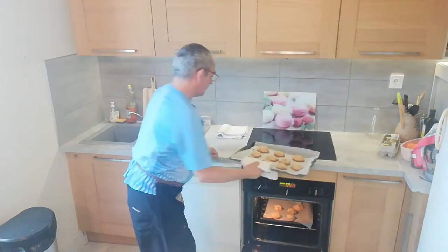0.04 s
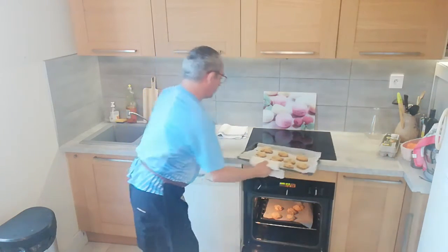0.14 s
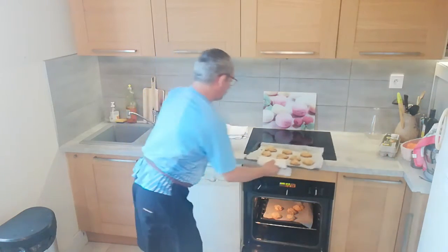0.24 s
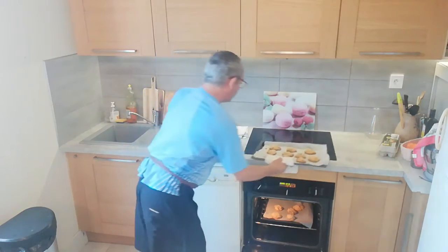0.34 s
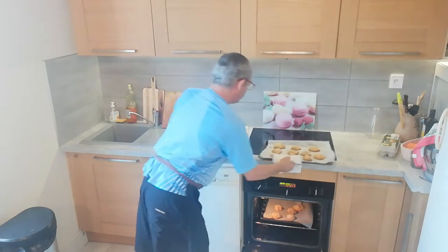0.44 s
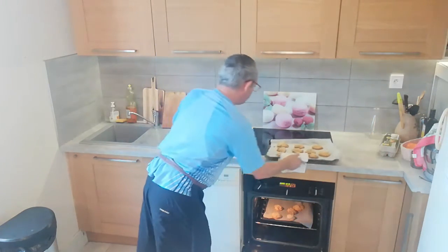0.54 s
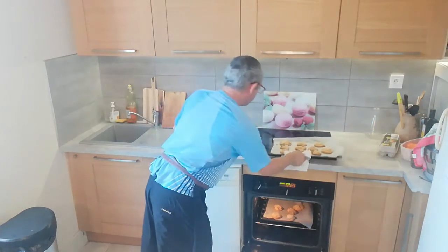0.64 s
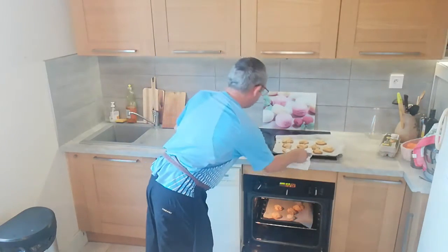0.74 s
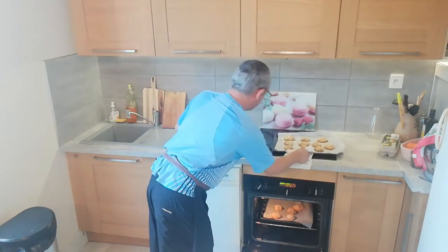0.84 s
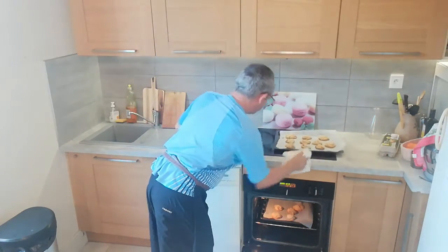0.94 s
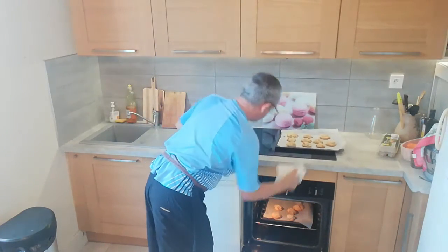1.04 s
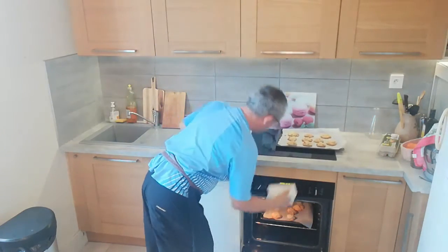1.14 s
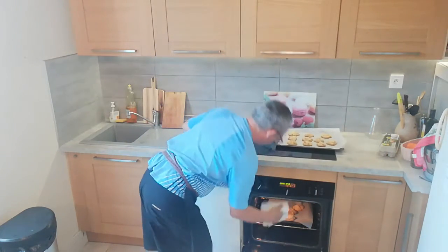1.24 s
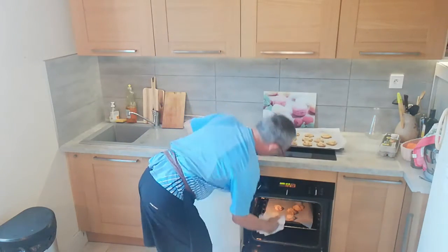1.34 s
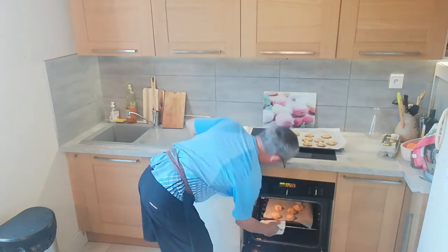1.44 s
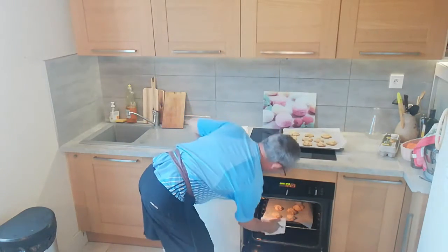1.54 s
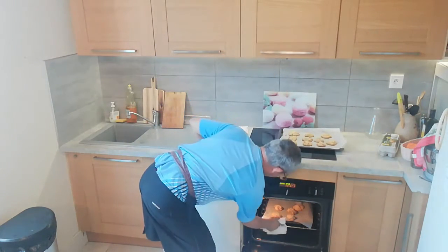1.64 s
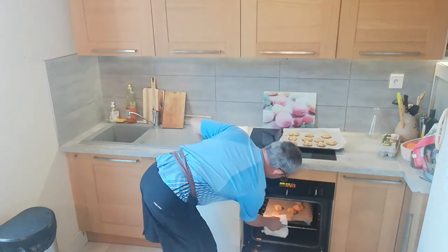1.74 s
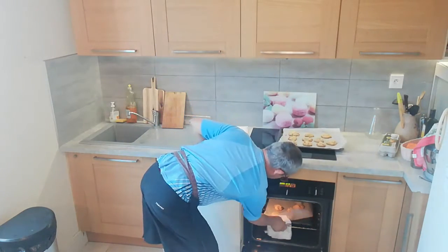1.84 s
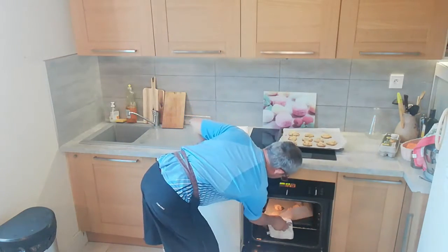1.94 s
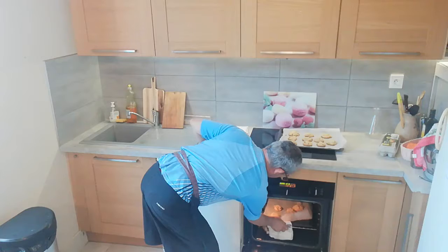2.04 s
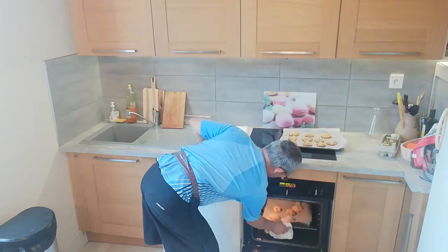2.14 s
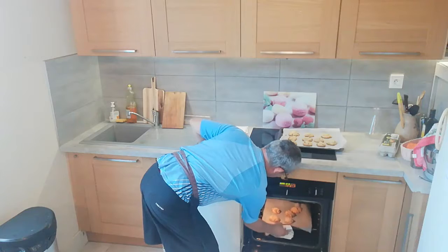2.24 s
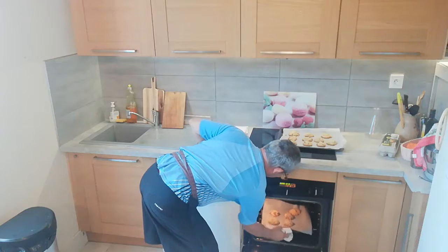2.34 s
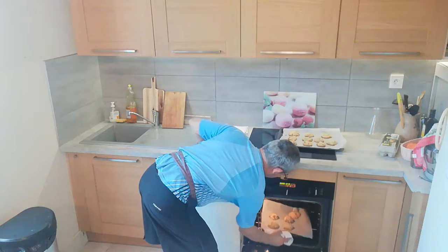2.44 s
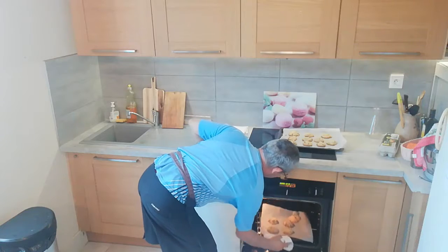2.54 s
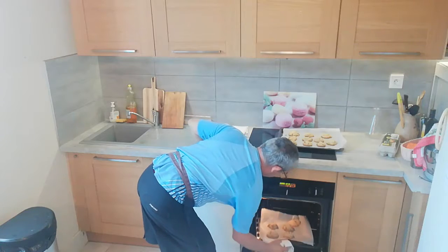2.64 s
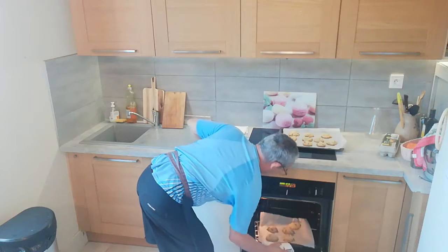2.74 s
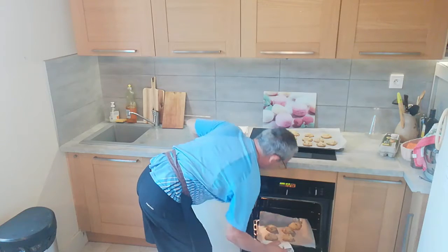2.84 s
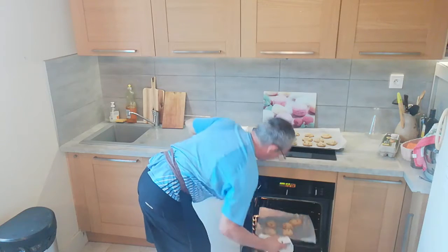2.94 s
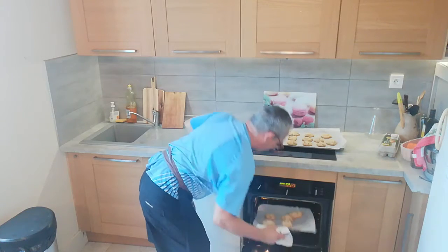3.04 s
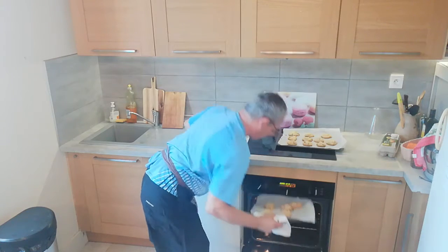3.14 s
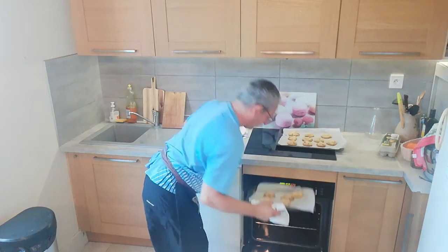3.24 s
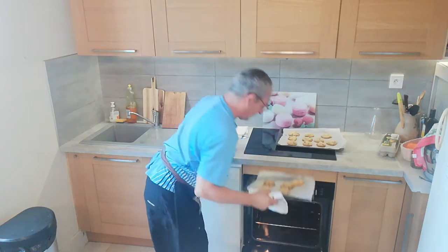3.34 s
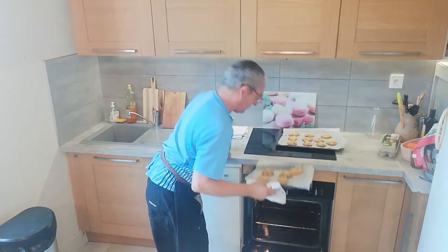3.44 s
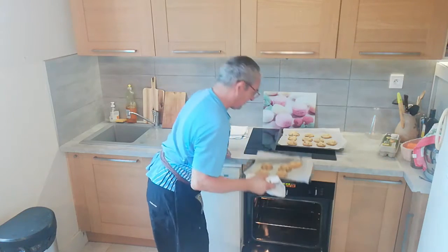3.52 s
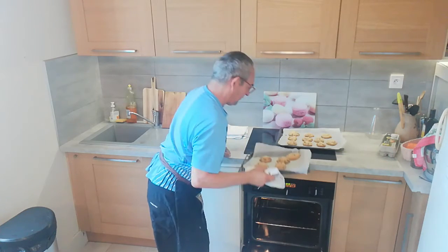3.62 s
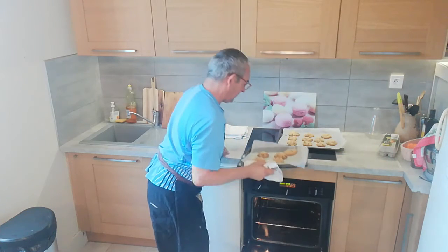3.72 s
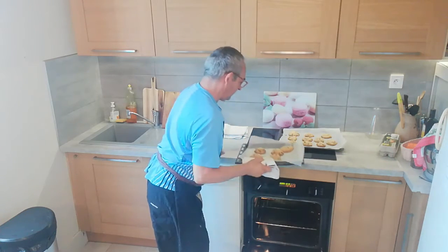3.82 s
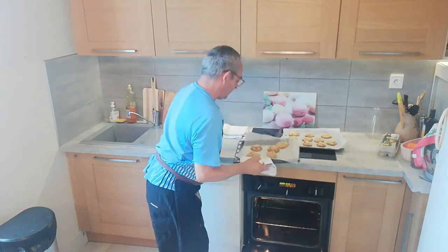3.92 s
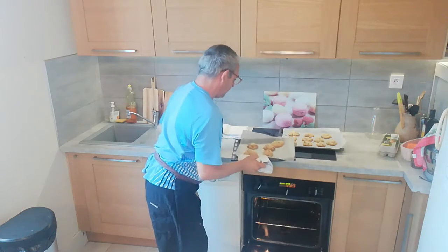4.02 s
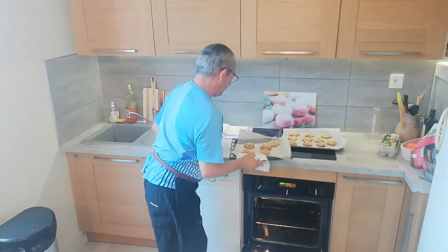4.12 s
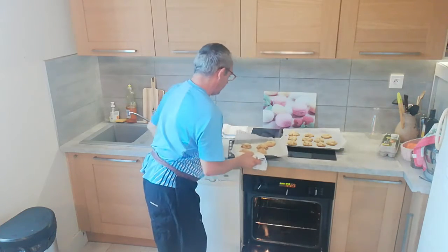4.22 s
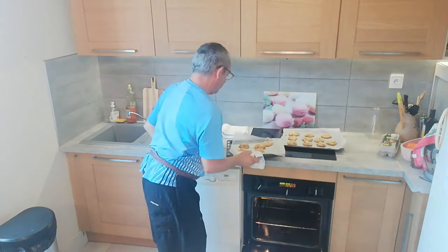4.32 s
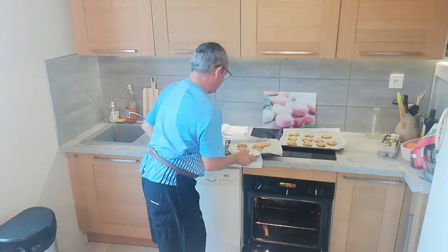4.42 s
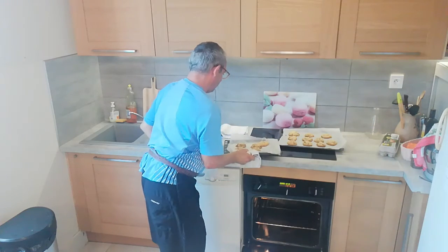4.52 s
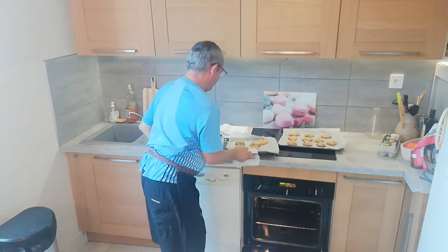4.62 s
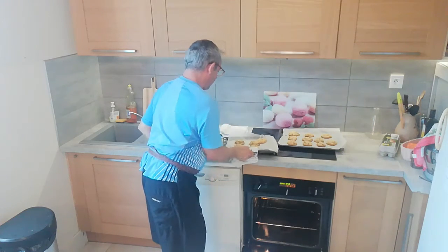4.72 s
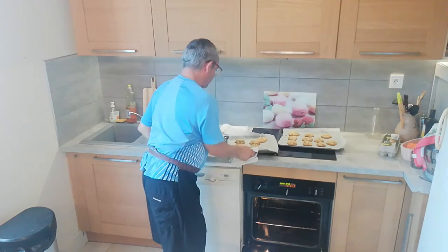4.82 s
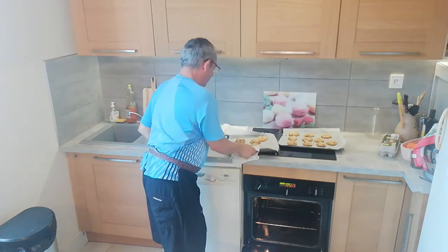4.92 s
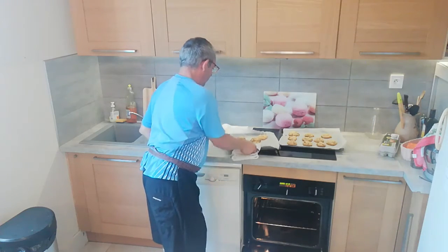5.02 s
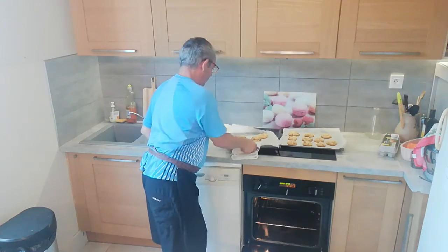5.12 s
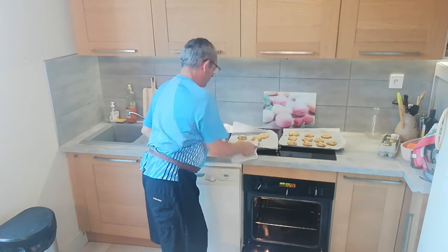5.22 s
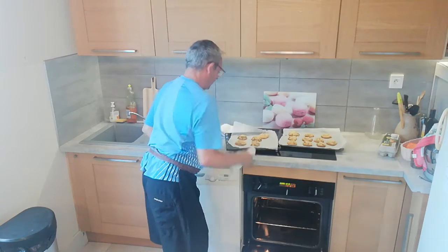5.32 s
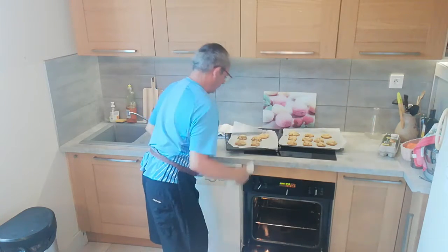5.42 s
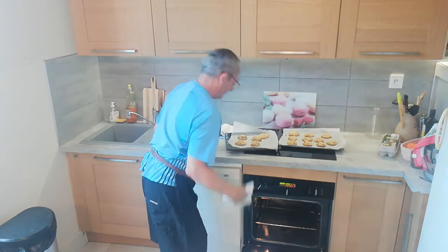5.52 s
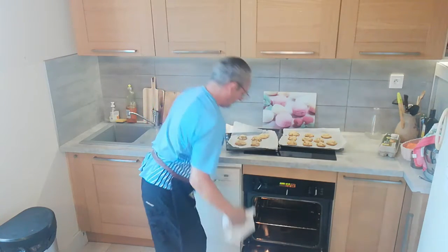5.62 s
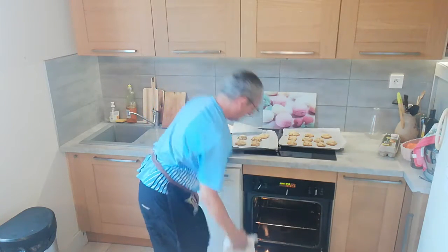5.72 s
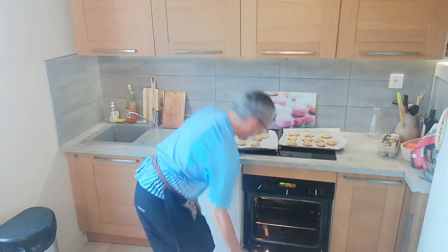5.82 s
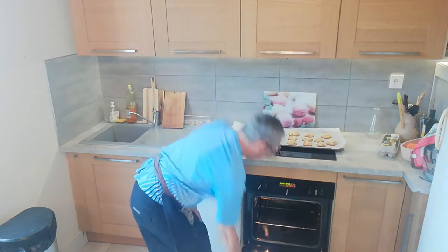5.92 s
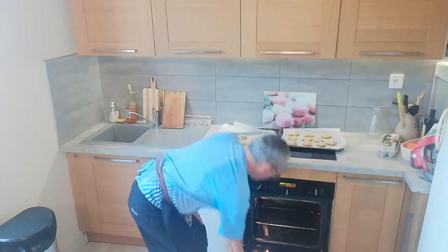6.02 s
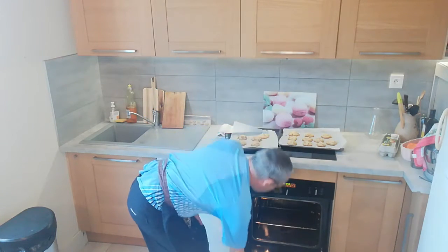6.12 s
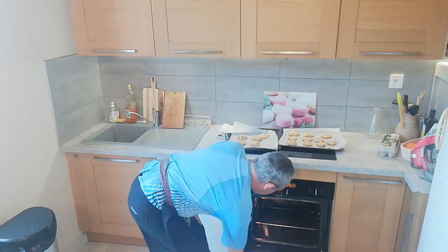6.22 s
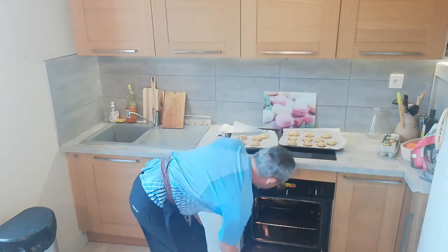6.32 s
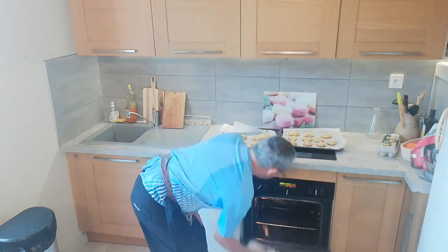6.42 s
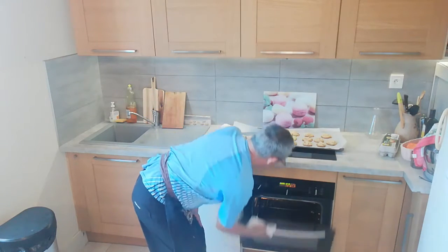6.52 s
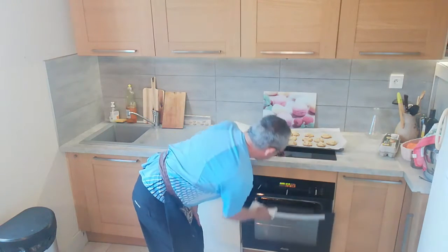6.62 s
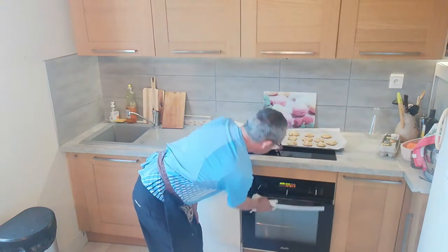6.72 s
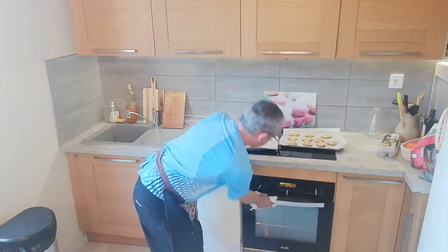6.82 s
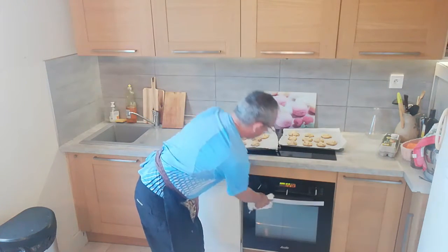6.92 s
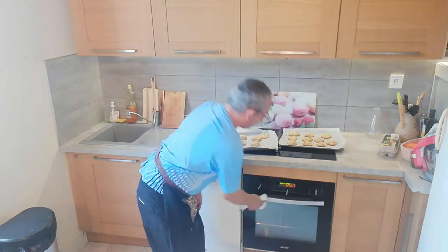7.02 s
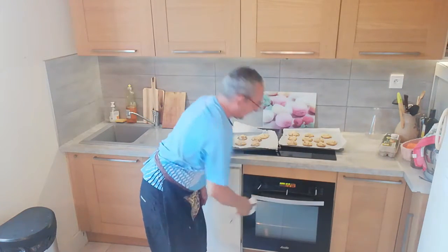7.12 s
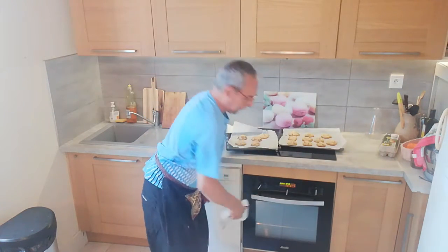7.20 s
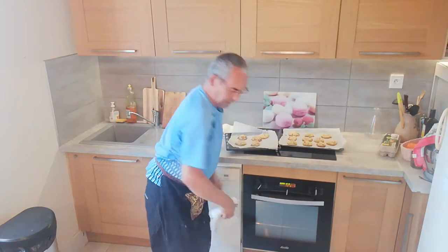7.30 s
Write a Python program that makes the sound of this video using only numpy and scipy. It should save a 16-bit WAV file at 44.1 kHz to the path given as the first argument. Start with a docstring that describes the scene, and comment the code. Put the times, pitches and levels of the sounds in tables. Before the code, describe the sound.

In a small hard-walled kitchen with a low fan hum, a metal tray bangs down and rattles on the worktop. Another is scraped from the oven with rack knocks, lifted almost quietly, then shuffled and clacked down. The oven door squeaks on its hinge and shuts with a soft double thump. Stereo microphones a short way off, right side brighter.

```python
"""Baking trays and an oven door

Baking trays are slid out of an oven and knocked down on a worktop in a hard-walled kitchen: bursts of contacts
strike dense steel modes or brighten the peaks of slides, pushes ring heavier bodies, knocks ring the rack, and
strokes of grainy noise hiss between. The oven door squeaks and whines on its hinge (fluttering tones); it bumps
and thumps shut. Coloured noise makes the fan and its hum. Of two spaced microphones, the right one is nearer
and brighter."""
import sys
import numpy as np
from scipy import signal
from scipy.fft import rfft, irfft, next_fast_len
from scipy.io import wavfile
from scipy.ndimage import uniform_filter1d

SR = 44100
rng = np.random.default_rng(int(sys.argv[2]) if len(sys.argv) > 2 else 0)


def store_pcm(level_fs):
    """Save levels as 16-bit WAV."""
    pcm = np.round(np.clip(level_fs, -1, 1) * 32767).astype(np.int16)
    wavfile.write(sys.argv[1], SR, np.atleast_2d(pcm).T)


N = 324576
SIZE = next_fast_len(N + SR)   # transform length, with room for filter tails
HZ = np.maximum(np.arange(SIZE // 2 + 1) * SR / SIZE, 1)


def amp(db):
    """Decibel law: level in dB to amplitude ratio."""
    return 10 ** (np.asarray(db) / 20)


def rms_one(x):
    """Normalisation to unit root mean square."""
    return x / np.sqrt(np.mean(x ** 2) + 1e-20)


def at_hz(points, hz):
    """Interpolation along a logarithmic frequency axis, as hearing spaces pitch."""
    points = np.array(points)
    return np.interp(np.log(hz), np.log(points[:, 0]), points[:, 1])


def band(x, low_hz, high_hz, spectrum):
    """Linear filtering: one coloured band of x; white input of rms 1 leaves with rms 1."""
    edges = 1 / np.sqrt((1 + (low_hz / HZ) ** 6) * (1 + (HZ / high_hz) ** 6))
    response = rms_one(edges * amp(at_hz(spectrum, HZ)))
    return irfft(rfft(x, SIZE) * response, SIZE)[:N]


def ring(x, modes):
    """Modal superposition: a unit click sets every damped resonator ringing at its own height."""
    out = 0
    for hz, level_db, t60 in modes:
        radius = amp(-60 / (t60 * SR))
        turn = 2 * np.pi * hz / SR
        feed = [0, amp(level_db) * np.sin(turn)]
        poles = [1, -2 * radius * np.cos(turn), radius * radius]
        out = out + signal.lfilter(feed, poles, x + 1e-18)
    return out


def stroke(start, swell, hold, fade):
    """Exponential envelope: the gain of one gesture swells evenly in dB, holds, then fades evenly in dB."""
    swell_db = 23.5   # climbed during the swell, and lost again in each fade time
    t = np.arange(N) / SR - start
    below = np.minimum(t / max(swell, 1e-3) - 1, (swell + hold - t) / fade)
    return amp(swell_db * np.minimum(below, 0)) * (t > 0)


# Coherence of the microphones above the bass. Each row: frequency in Hz, share of sound common to both (0-1).
COHERENCE = [(250, 0.73), (640, 0.37), (1400, 0.18), (3000, 0.27), (12000, 0.19)]
# Phase that the housing adds to the left lag above the bass. Each row: frequency in Hz, phase in radians.
HOUSING_PHASE = [(340, -0.9), (640, 0.76), (1030, 0.82), (1300, 1), (3000, 0.45), (6000, 0.8)]


def microphones(common, own, lean):
    """Spatial coherence: two spaced capsules share part of each spectrum, later at the left; bass reaches both alike."""
    left_lag_s = 0.00059
    apart = 1 / (1 + (200 / HZ) ** 3)   # near 0 for long bass waves, near 1 well above 200 Hz
    alike = 1 - apart * (1 - np.clip(at_hz(COHERENCE, HZ), 0, 1))
    phase = apart * (2 * np.pi * HZ * left_lag_s + at_hz(HOUSING_PHASE, HZ))
    late = np.exp(-1j * phase)
    tilt = amp(apart * at_hz(lean, HZ) / 2)
    left = np.sqrt(alike) * common * late + np.sqrt(1 - alike) * own[0]
    right = np.sqrt(alike) * common + np.sqrt(1 - alike) * own[1]
    return irfft(np.array([left * tilt, right / tilt]), SIZE)[:, :N]


# Colour of fan and room air. Each row: frequency in Hz, relative spectral density in dB per Hz.
AIR_COLOUR = [(12, -45.5), (20, -8), (53, -4), (70, -11.5), (101, -7), (163, -12), (198, -5), (228, -10.5),
              (434, -18.5), (499, -17), (873, -11), (1000, -12.5), (1220, -13), (2530, -18.5),
              (16000, -35.5)]
# Narrow bands of fan hum. Each row: centre in Hz, width in Hz, level in dB before the final mix.
FAN_HUM = [(43.4, 12, -77.5), (96.3, 8, -80), (195, 12, -84), (891.3, 9, -78)]
# Balance of the air above the bass. Each row: frequency in Hz, left minus right in dB.
AIR_BALANCE = [(60, -1), (240, 0), (950, -2), (3770, -3), (15000, 0)]


def air():
    """Stationary random noise: steady fan noise with a few wavering narrow-band hums, filling the room."""
    colour = amp(-68.5) * rms_one(amp(at_hz(AIR_COLOUR, HZ)))
    for hz, width, level_db in FAN_HUM:
        resonance = rms_one(1 / (1 + (2 * (HZ - hz) / width) ** 2))
        colour = np.hypot(colour, amp(level_db) * resonance)   # unrelated noises add in power
    noise = rfft(rng.standard_normal((3, SIZE))) * colour
    return microphones(noise[0], noise[1:], AIR_BALANCE)


# Slides and shuffles. Each row: start in seconds, swell in seconds, hold in seconds, hiss in dB before the mix,
# body in dB relative to the hiss, sheen in dB relative to the hiss.
SLIDE_STROKES = [(-0.03, .03, 0.1, -53.5, -4.5, -13.5), (0.681, 0.16, .01, -48.5, 8.5, -14),
                 (0.883, 0.015, 0.18, -48.5, -12, -11), (1.746, .03, .08, -52, -6, -10.5),
                 (1.83, 0.038, 0.081, -46.5, -1, -16), (1.893, 0.16, 0.018, -41.5, -6, -6.5),
                 (2.075, .02, 0.14, -56.5, 1, -20.5), (2.214, 0.05, 0.064, -47.5, -9, -31),
                 (2.422, .03, 0.126, -52, -10, -20), (2.554, 0.026, 0.078, -60.5, 1.5, -14.5),
                 (2.896, 0.017, 0.00995, -66.5, 3, -7), (3.028, .02, 0.047, -53.5, 1, -34),
                 (3.037, 0.079, 0.039, -44.5, -6, -7.5), (3.57, 0.043, .05, -54.5, -9.5, -15.5),
                 (4.53, .03, .12, -45, 6, -30.5), (4.674, 0.024, 0.19, -56, 7.5, -13.5),
                 (4.855, 0.024, .14, -55.5, 0, -24), (4.994, 0.079, 0.076, -44.5, -6, -10.5),
                 (5.161, 0.047, .03, -49, 3.5, -13), (5.284, 0.019, 0.023, -48.5, -2, -34),
                 (5.775, 0.11, .02, -42, -11, -17.5), (6.435, 0.077, 0.022, -49.5, -12, -16),
                 (6.564, .02, .07, -61.5, 3, -22), (7.138, 0.12, 0.087, -58.5, -1.5, -16)]
# Colour of sliding contact. Each row: frequency in Hz, relative spectral density in dB per Hz.
SLIDE_COLOUR = [(150, -37.5), (250, 0.5), (330, -17), (421, -3), (586, -19), (651, -10.5), (1530, -3),
                (4190, -5), (4820, -7), (7980, -7.5), (16000, -35.5)]


def slides(grit_db):
    """Friction noise: dense grains of uneven size sound in three bands under each stroke."""
    levels = 0
    for start, swell, hold, hiss_db, body_db, sheen_db in SLIDE_STROKES:
        gains = amp([hiss_db, hiss_db + body_db, hiss_db + sheen_db])
        levels = levels + np.outer(gains, stroke(start, swell, hold, fade=0.054))
    grain_db = grit_db * np.minimum(rng.exponential(1, N), 5)
    grains = rms_one(rng.standard_normal(N) * amp(grain_db))
    hiss = band(grains, 3600, 5500, SLIDE_COLOUR)
    body = band(grains, 200, 2100, SLIDE_COLOUR)
    sheen = band(grains, 8000, 15000, SLIDE_COLOUR)
    return levels[0] * hiss + levels[1] * body + levels[2] * sheen


# Blows on trays, rack and door, and short bright bursts at the peaks of slides. Each row: time in seconds,
# clang in dB before the mix, then in dB relative to the clang: weight (low ring), hardness (bite of the steel),
# tick (sharp top of a small hard contact); last, decay time constant of the rattle in seconds.
CONTACT_BURSTS = [(0.2235, -16, -17, -0.5, -10, 0.0035), (0.2455, -27.5, -0.5, -6, -18, 0.0079),
                  (0.3387, -19.5, -14, -7, -14, 0.006), (0.3898, -33.5, -1.5, -5.5, -18, 0.0042),
                  (0.4305, -35, -7, -2, -10, 0.0051), (0.49, -36.5, -20, -23, -6.5, 0.0027),
                  (0.8136, -48.5, 0, 9.5, 1, 0.022), (0.8422, -24, -11.5, -5.5, -15.5, 0.0017),
                  (1.7411, -58.5, -14, 9, 12.5, 0.0039), (1.8543, -54.5, -15, 6.5, 11.5, 0.0048),
                  (2.0026, -58.5, -16, 17.5, 11, 0.0072), (2.0585, -49.5, -29, 7, 12, 0.01),
                  (2.0844, -42.5, -28, -1.5, -3, 0.0069), (2.27, -54.5, -2, -4, 0, 0.011),
                  (2.4157, -39.5, 4.5, -20, -8, 0.0049), (2.4373, -43, -3, -15, -15, 0.0063),
                  (2.5988, -49.5, 1.5, -7, -5, 0.0022), (3.141, -55, -15, 8.5, -5, 0.0018),
                  (3.1906, -57, -12, -10, 6.5, 0.0033), (3.6099, -54.5, -13, 2, -6, 0.0038),
                  (3.6336, -55, -14, 6, 0.5, 0.0034), (4.1647, -63.5, -9, 3, 1.5, 0.0056),
                  (4.2794, -69, -6, 3.5, 2, 0.006), (4.5148, -40, -7.5, 6.5, 4, 0.0043),
                  (4.5972, -32.5, -7.5, -5, -22, 0.0056), (4.7027, -48, -4, 5.5, 1, 0.0038),
                  (4.778, -54, 5.5, 2.5, 6, 0.0046), (4.8763, -42.5, -1, -3.5, -11, 0.0048),
                  (5.083, -56, -10, -6, 13, 0.0031), (5.1822, -52, -4, -4, 9, 0.0041),
                  (5.264, -17.5, -15, -1, -19.5, 0.0042), (5.2895, -40.5, 4, 16, -1.5, 0.053),
                  (5.9331, -56.5, -12, 16, 11, 0.004), (6.6619, -40, 2, 1.5, 2.5, 0.0037),
                  (6.9445, -56.5, -1.5, -2, 3, 0.012), (6.983, -34.5, -2.5, -17, -9.5, 0.0069),
                  (7.0082, -41, -1.5, -9, -11, 0.022)]


def rattle(levels_db):
    """Contact excitation: each row is a burst of uneven contacts that swells for a moment and dies."""
    length = 4000   # samples
    out = np.zeros(N + length)
    t = np.arange(length) / SR
    for (s, *_, decay_s), level_db in zip(CONTACT_BURSTS, levels_db):
        shape = (1 - np.exp(-t / 0.0039)) ** 2 * np.exp(-t / max(decay_s, 1e-4))
        contacts = shape * rng.standard_normal(length) * rng.exponential(1, length)
        tones = rfft(contacts)
        # hard contacts excite all pitches about evenly
        burst = np.sqrt(shape) * irfft(tones / np.abs(tones), length)
        start = round((s - 0.002) * SR)   # the swell leads the listed time
        out[start:start + length] += amp(level_db) * rms_one(burst)
    return out[:N]


# Colour of struck steel. Each row: frequency in Hz, relative spectral density in dB per Hz.
STEEL_COLOUR = [(120, -33.5), (200, 4), (328, -0.5), (671, -3.5), (735, 0), (851, -5.5), (1040, -6),
                (1740, -6), (2020, -10), (3070, -2.5), (6640, -16), (14600, -42), (16000, -44.5)]
# Clearest modes of the tray. Each row: frequency in Hz, relative level in dB, 60 dB decay time in seconds.
TRAY_MODES = [(421.7, -1.5, 0.21), (809, -3.5, 0.52), (1280, 1.5, 0.37), (1385, -3.5, .25),
              (1490, -0.5, 0.17), (1560, -3.5, .2), (1740, -1.5, 0.35), (2725, -3, .15), (3070, -1.5, .15),
              (3330, -3.5, 0.093), (3400, -6, .15), (4360, 3, 0.12)]


def steel():
    """Modal density: bursts give a crash of modes too dense to tell apart and, separately, the tray's clear rings."""
    _, clang, weight, hardness, tick, _ = np.transpose(CONTACT_BURSTS)
    crash = band(rattle(clang), 980, 2200, STEEL_COLOUR)
    crash += band(rattle(clang + weight), 170, 900, STEEL_COLOUR)
    crash += band(rattle(clang + hardness), 1900, 4900, STEEL_COLOUR)
    crash += band(rattle(clang + tick), 5500, 15000, STEEL_COLOUR)
    free_ring_db = -58.5   # relative to the clang
    return amp(-10.0) * crash, ring(rattle(clang + free_ring_db), TRAY_MODES)


# Pushes on floor and panels. Each row: time in seconds, relative level in dB, place along the bodies
# (0 floor, 1 door panel, 2 oven walls, 3 tray bed), loss in dB for each body further off.
PUSHES = [(0.227, -36.5, 2.2, 4), (0.25, -43.5, 2.8, 4), (0.345, -41.5, 2.9, 2.5), (0.431, -45.5, 3.3, 2),
          (0.839, -39, 3.1, 4), (1.901, -59, 2.7, 7), (2.082, -54, 2, 9.5), (2.24, -53.5, 2.25, 10),
          (2.418, -28, 1.95, 22), (2.438, -30.5, 2.03, 21), (2.54, -46, 2.2, 8), (2.599, -48, 2.1, 14),
          (4.52, -47, 1.6, 12), (4.602, -35, 2.36, 13), (4.681, -41.5, 3.3, 6.5), (4.877, -43, 1.5, 10),
          (5.181, -59.5, 2.9, 5.5), (5.265, -30, 1.9, 7.5), (5.31, -33.5, 1.8, 6.5), (5.371, -43, 1.95, 5),
          (6.662, -41.5, 0.78, 8.5), (6.79, -54, 0.1, 8), (6.972, -31.5, 0.1, 12), (6.994, -37, 0.2, 1.5),
          (7.02, -32.5, 0.99, 6.5), (7.17, -54, 0.3, 6)]
# One list a body, in that order. Each row: frequency in Hz, relative level in dB, 60 dB decay time in seconds.
BODY_MODES = [
    [(47, 5, 0.48), (49, 3, 0.23)],
    [(99.6, 4, 0.31), (86, -5.5, .3)],
    [(140, 3, 0.33), (185.4, 0.5, 0.58)],
    [(228.8, -6, .3), (269, 2, 0.23), (317, -10.5, .3), (415, -2, 0.21)],
]


def thumps():
    """Impulse response: each push, smoothed to about one swing of the body it moves, sets that body ringing."""
    s, level_db, place, loss_db = np.transpose(PUSHES)
    out = 0
    for k, modes in enumerate(BODY_MODES):
        push, hz = np.zeros(N), modes[0][0]
        push[np.round(s * SR).astype(int)] = -amp(level_db - loss_db * np.abs(k - place))
        swing = signal.butter(1, [0.63 * hz, 0.92 * hz], "band", fs=SR, output="sos")
        out = out + ring(signal.sosfilt(swing, push), modes)
    return out


# Knocks that ring the oven rack. Each row: time in seconds, relative level in dB.
KNOCKS = [(2.42, -47.5), (2.445, -56), (2.51, -50.5), (2.599, -60), (2.672, -61), (6.671, -60), (6.98, -48),
          (7.02, -53)]
# Modes of the wire rack. Each row: frequency in Hz, relative level in dB, 60 dB decay time in seconds.
RACK_MODES = [(611.5, -10, 0.61), (687, 1, 0.19), (776, -7, 0.58), (1006, -1, 0.33)]


def rack():
    """Free vibration: soft knocks leave the wire rack ringing in its own modes."""
    s, level_db = np.transpose(KNOCKS)
    push = np.zeros(N)
    push[np.round(s * SR).astype(int)] = amp(level_db)
    return ring(push, RACK_MODES)


# The hinge catches and squeaks as the door rises. Each row: start in seconds, swell in seconds, hold in seconds,
# level in dB of the fundamental, before flutter.
HINGE_SQUEAKS = [(6.501, 0.034, 0.014, -51), (6.567, .011, .003, -59), (6.586, 0.015, 0.046, -62)]
# Thin whine of the hinge, sagging in pitch. Each row: start in seconds, swell in seconds, hold in seconds, #
# level in dB before flutter, starting pitch in Hz.
HINGE_WHINES = [(6.654, .16, 0.017, -66, 7100), (6.96, 0.19, 0.15, -77, 6960)]


def squeaks(flutter_db):
    """Stick-slip oscillation: a harmonic squeak and a sagging whine, with randomly fluttering strength."""
    squeak_hz, sag_hz_per_s = 4480, 560
    t = np.arange(N) / SR
    tone = 0
    for harmonic, db in enumerate((0, -17.5, -36), start=1):
        tone = tone + amp(db) * np.sin(2 * np.pi * harmonic * squeak_hz * t)
    out = np.zeros(N)
    for s, swell, hold, db in HINGE_SQUEAKS:
        out += amp(db) * stroke(s, swell, hold, fade=0.018) * tone
    for s, swell, hold, db, hz in HINGE_WHINES:
        age = t - s
        cycles = (hz - sag_hz_per_s * age / 2) * age   # integral of the falling pitch
        out += amp(db) * stroke(s, swell, hold, fade=0.14) * np.sin(2 * np.pi * cycles)
    flutter = rms_one(uniform_filter1d(rng.standard_normal(N), size=250))
    return np.sqrt(2) * out * amp(flutter_db * flutter)   # root 2: a sine of rms 1


# Balance of all but the air, above the bass. Each row: frequency in Hz, left minus right in dB.
BALANCE = [(60, -5.5), (110, -4), (200, 0.5), (380, -1.0), (700, -3), (1290, 0.5), (2380, -4.5),
           (4400, -10.5), (8120, -13), (15000, 4.5)]


def direct(x):
    """Direct field: sound that reaches both capsules straight from the source."""
    spectrum = rfft(x, SIZE)
    return microphones(spectrum, [spectrum] * 2, BALANCE)


# Narrow peaks that room and steel modes leave in the echo. Each row: frequency in Hz, spread in dB.
PEAK_SPREAD = [(250, 3), (700, 3.5), (2000, 2), (8000, 0.5)]


def modal_noise(peak_hz, cluster_db=2.5):
    """Modal response: unrelated noises share one comb of narrow random peaks, flat on average."""
    width = round(peak_hz * SIZE / SR)
    comb = uniform_filter1d(rng.standard_normal(len(HZ)), size=width)
    comb = rms_one(uniform_filter1d(comb, size=width))
    clusters = rms_one(uniform_filter1d(rng.standard_normal(len(HZ)), size=8 * width))   # of modes
    peaks = amp(at_hz(PEAK_SPREAD, HZ) * comb + cluster_db * clusters)
    peaks /= np.sqrt(uniform_filter1d(peaks ** 2, size=40 * width))
    return irfft(rfft(rng.standard_normal((2, 3, SIZE))) * peaks, SIZE)[..., :N]


# Reverberation of the kitchen. Each row: frequency in Hz, 60 dB decay time in seconds.
REVERBERATION = [(60, 0.85), (260, 0.48), (700, 0.42), (1840, 0.49), (4850, 0.46), (12800, 0.39)]


def kitchen(x, build_s, hall_db, hall_t60):
    """Diffuse field: each band stores energy, builds up and dies as noise; a little returns late from the next room."""
    edges = 120 * 2 ** np.arange(0, 7.2, .25)   # quarter octaves
    white, echo = modal_noise(peak_hz=12.0), 0
    fill = np.exp(-1 / (build_s * SR))
    linger = amp(-120 / (hall_t60 * SR))   # energy falls to a millionth in one decay time
    for k, (low, high) in enumerate(zip(edges, edges[1:])):
        sos = signal.butter(2, [low, high], "band", fs=SR, output="sos")
        keep = amp(-120 / (at_hz(REVERBERATION, np.sqrt(low * high)) * SR))
        power = signal.sosfilt(sos, x) ** 2 + 1e-18
        store = np.convolve([1, -keep], [1, -fill])
        energy = signal.lfilter([(1 - keep) * (1 - fill)], store, power)
        energy += amp(2 * hall_db) * signal.lfilter([1 - linger], [1, -linger], energy)
        level = np.sqrt(np.abs(energy) * SR / 2 / (high - low))
        echo = echo + level * signal.sosfilt(sos, white[k % 2])   # neighbouring bands use unrelated noise
    paths = rfft(echo, SIZE)
    return microphones(paths[0], paths[1:], BALANCE)


def scene():
    """Superposition: direct sound, reverberant sound and room air add at the microphones."""
    crash, rings = steel()
    low = thumps()
    noisy = crash + amp(-7.0) * slides(grit_db=1.5)
    straight = amp(-10.0) * noisy + rings + low + rack() + squeaks(flutter_db=4.0)
    into_room = noisy + amp(0.5) * rings + amp(-7.5) * low
    echo = kitchen(into_room, build_s=.004, hall_db=-26.0, hall_t60=1.3)
    return direct(straight) + echo + amp(6.0) * air()


def suppress(x):
    """Spectral gating: takes each band's 15th percentile of power as background, turns down what sinks towards it."""
    quiet_db, over_db = -3.5, 5   # gain on the background, margin above it where the gain opens
    _, _, frames = signal.stft(x, SR, nperseg=512, noverlap=384)
    power = np.mean(np.abs(frames) ** 2, axis=0)
    power = uniform_filter1d(uniform_filter1d(power, size=9, axis=0), size=7, axis=1)
    background = np.percentile(power, 15, axis=1, keepdims=True)
    opening = power ** 2 / (power ** 2 + (background * amp(2 * over_db)) ** 2)
    gain = amp(quiet_db * (1 - opening))
    return signal.istft(frames * gain, SR, nperseg=512, noverlap=384)[1][:, :N]


# Resonances of the microphone housing. Each row: centre in Hz, width in Hz, gain in dB.
HOUSING = [(1880, 680, -2), (3226, 900, -1), (4800, 300, 1.5), (6100, 700, -0.5), (7100, 3900, 0.5)]


def record(dry):
    """Transfer function: housing resonances, noise suppression, then a steep low-pass of the top."""
    colour_db = sum(db / (1 + (2 * (HZ - hz) / width) ** 2) for hz, width, db in HOUSING)
    coloured = irfft(rfft(dry, SIZE) * amp(colour_db), SIZE)[:, :N]
    low_pass = signal.cheby2(14, 70, 16200, fs=SR, output="sos")   # 70 dB down from 16200 Hz
    return signal.sosfilt(low_pass, suppress(coloured))


dry = scene()
out = record(dry)
store_pcm(out)
```